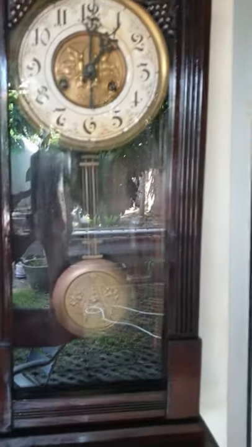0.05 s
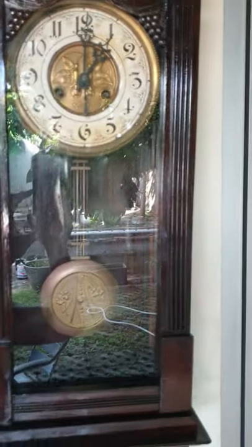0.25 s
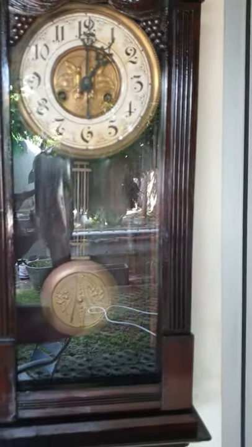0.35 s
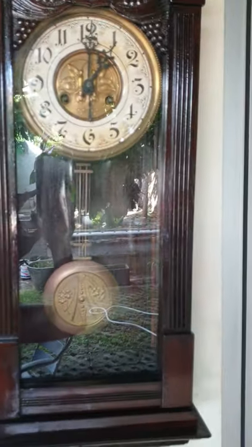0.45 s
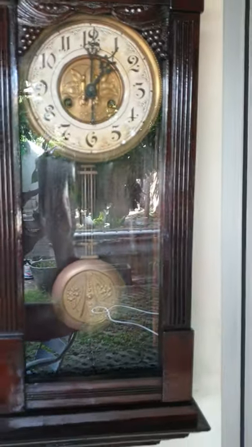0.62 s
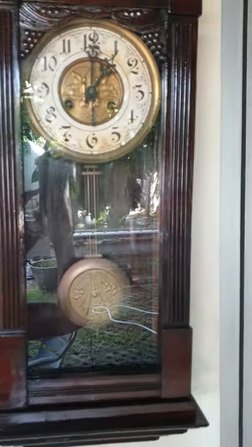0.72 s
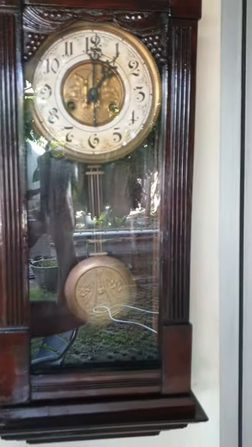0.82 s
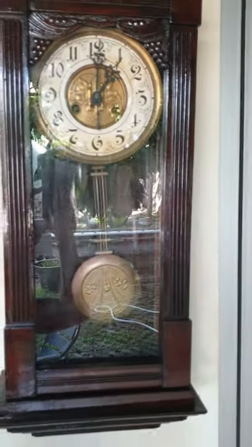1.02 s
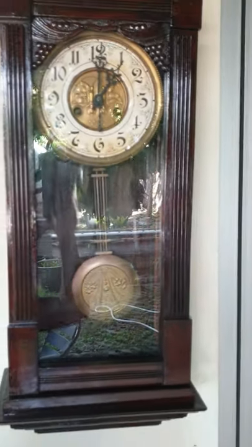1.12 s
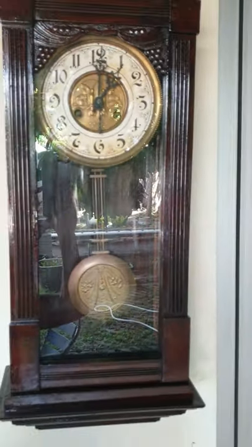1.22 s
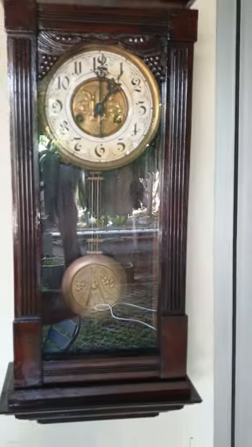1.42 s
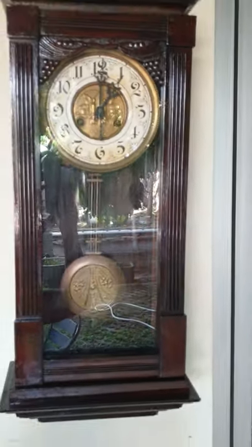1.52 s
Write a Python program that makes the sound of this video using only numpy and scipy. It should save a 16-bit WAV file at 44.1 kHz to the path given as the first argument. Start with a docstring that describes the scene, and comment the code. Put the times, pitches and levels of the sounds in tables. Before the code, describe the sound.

Two crisp mechanical ticks from a pendulum clock over faint room hiss.

```python
"""Two dry ticks, one pendulum swing apart, in a quiet room.
Each is a cluster of sharp clicks with a hollow knock, a low thump and a short ring.
Fainter ticks fall between and after them. Behind the ticks are soft room hiss
and the uneven rumble of a hand-held microphone, mostly on the right."""
import sys
import numpy as np
from scipy import signal
from scipy.fft import rfft, irfft
from scipy.io import wavfile
from scipy.ndimage import uniform_filter1d

SR = 44100
rng = np.random.default_rng(int(sys.argv[2]) if len(sys.argv) > 2 else 0)


def persist_wave(psi):
    """Save psi, clipped to +-1, as 16-bit WAV."""
    counts = np.round(np.clip(psi, -1, 1) * 32767).astype(np.int16)
    wavfile.write(sys.argv[1], SR, np.atleast_2d(counts).T)


N = 68355  # 1.55 seconds

# How a click rings: "tick" is a narrow ping, "tock" is broader and glassier. Columns: pitch_hz, gain_db
CLICK_TONES = {"tick": [(300, -5), (2100, -9), (3000, -7.5), (4100, -8.5), (5000, 5), (5750, 9),
               (6500, 1.5), (7300, 6), (8500, -8), (11000, -1.5), (13500, -12), (15400, -22), (16300, -30)],
               "tock": [(300, -20), (2100, -1.5), (3100, -2.5), (4300, -6), (5500, 0), (7200, -3.5),
               (8800, -15), (11400, -1), (12400, -8), (14300, -6), (15400, 2), (16300, -10)]}
# Sharp clicks. Positive pan leans left; positive tilt is brighter.
# Columns: start_s, level_db, pan_db, tilt_db_per_octave, chatter_ms, tone_name
CLICK_HITS = [(0.21, -40.5, 12, -8, 0.18, "tick"), (0.2112, -42, 14, 11, 0.19, "tick"),
              (0.2144, -35, 14, -3, .1, "tick"), (0.219, -29, 18, 4, 0.53, "tick"),
              (0.2203, -17.5, 11.5, 1.5, .015, "tick"), (0.2346, -28, 14, 14.5, .015, "tick"),
              (.7811, -45, -10, 7, 0.06, "tick"), (.913, -52, -6, 6, 0.27, "tock"),
              (0.918, -38, -12, 0, .2, "tock"), (0.9298, -31.5, 1, -6, 0.25, "tock"),
              (0.9335, -49, -28, -5, .3, "tock"), (0.9408, -28.5, -23, 1.5, 0.33, "tock"),
              (0.9418, -38, -16, -4, 0.37, "tock"), (0.952, -49, -7, 4, .2, "tock"),
              (.9739, -39.5, -13, -6.5, .2, "tock"), (1.0432, -46, -12, 4, 0.13, "tock")]


def clicks():
    """Each click is a spike and a brief chatter that set off a bright, very short ring."""
    t, out = np.arange(N) / SR, 0
    freq_hz = np.arange(N // 2 + 1) * SR / N
    octaves = np.log2(np.maximum(freq_hz, 1500) / 7000)  # the tilt pivots at 7000 Hz
    for start_s, level_db, pan_db, tilt_db, chatter_ms, tone_name in CLICK_HITS:
        push = 0.64 * rng.standard_normal(N) * np.exp(-t * 1000 / chatter_ms)
        push[0] = 1  # the opening spike
        ring = ring_after_hit(tone_gain(CLICK_TONES[tone_name]) * undb(tilt_db * octaves))
        click = filtered(push / np.linalg.norm(push), ring)
        out = out + place(click * undb(level_db), start_s, pan_db)
    return out


# Hollow knocks. Here and below, fade_s is the time to die away by 60 dB.
# Columns: start_s, level_db, pan_db, pitch_hz, fade_s, cutoff_hz
KNOCK_HITS = [(0.22, -19.5, -3, 317, 0.0047, 2100), (0.235, -40, 23.5, 685, 0.0055, 1180),
              (0.3271, -40.5, 6, 420, 0.014, 1210), (0.9295, -37, 17, 520, 0.0077, 1430),
              (0.9407, -32.5, 7, 497, 0.012, 1080), (.974, -47, -13, 616, 0.0061, 1210),
              (1.088, -44, -9, 280, 0.0094, 1100)]


def knocks():
    """Each knock is one note that dies almost at once; a lower cutoff makes it duller."""
    t, out = np.arange(N) / SR, 0
    for start_s, level_db, pan_db, pitch_hz, fade_s, cutoff_hz in KNOCK_HITS:
        note = undb(level_db - 60 * t / fade_s) * np.cos(2 * np.pi * pitch_hz * t)
        soften = signal.butter(6, cutoff_hz, fs=SR, output="sos")
        out = out + place(signal.sosfilt(soften, note), start_s, pan_db)
    return out


# Low thumps. Columns: start_s, level_db, pan_db, starting_pitch_hz, fade_s
THUMP_HITS = [(0.2205, -26.5, -24, 88.2, 0.12), (0.2356, -24, 3, 89, 0.028),
              (0.9293, -41.5, -31, 117, 0.043), (0.9428, -33.5, -20, 104, 0.1)]


def thumps(rise_s=0.001, sag_s=0.024, sag_fraction=0.605):
    """A few slow swings of pressure under each loud tick, sagging in pitch as they die."""
    t, out = np.arange(N) / SR, 0
    sag = 1 - sag_fraction * (1 - np.exp(-t / sag_s))
    for start_s, level_db, pan_db, starting_pitch_hz, fade_s in THUMP_HITS:
        swing = -np.sin(2 * np.pi * np.cumsum(starting_pitch_hz * sag) / SR)
        loudness = (1 - np.exp(-t / rise_s)) * undb(level_db - 60 * t / fade_s)
        out = out + place(swing * loudness, start_s, pan_db)
    return out


# Faint ticks, and the ringing after the loud ones.
# Columns: start_s, level_db, pan_db, centre_hz, width_hz, fade_s
RING_BANDS = [(.222, -67.5, 7.5, 11500, 7200, 0.38), (0.33, -69, 17.5, 6667, 3530, 0.15),
              (0.333, -53.5, 7, 416.7, 550, 0.13), (.930, -50.5, -0.5, 380, 700, 0.38),
              (0.937, -60, 0, 5556, 8000, 0.36), (1.535, -62.5, -4.5, 5050, 2480, .2),
              (1.538, -53, -5, 1590, 450, 0.32)]


def rings(rise_s=0.0017):
    """Hazy ringing: a band of noise that rises fast and dies away, different in each ear."""
    t, out = np.arange(N) / SR, 0
    freq_hz = np.arange(N // 2 + 1) * SR / N + 1
    for start_s, level_db, pan_db, centre_hz, width_hz, fade_s in RING_BANDS:
        off_centre = (freq_hz - centre_hz ** 2 / freq_hz) / (2 * width_hz)
        band = unit(filtered(rng.standard_normal((2, N)), 1 / (1 + off_centre ** 2) ** 2))
        loudness = (1 - np.exp(-t / rise_s)) * undb(level_db - 60 * t / fade_s)
        out = out + band * place(loudness, start_s, pan_db)
    return out


# The deep tone of the rumble. Columns: pitch_hz, gain_db
RUMBLE_TONE = [(15, -8), (35, -6), (62, 5.5), (100, -4), (170, -8), (300, -25.5), (600, -49), (1500, -97)]
# How loud the rumble is on the right. Columns: time_s, level_db
RUMBLE_SWELLS = [(0, -52.5), (.06, -39), (.13, -57.5), (.2, -46), (.27, -41), (.32, -43), (.42, -39.5),
                 (.48, -47.5), (.56, -42.5), (.62, -63), (.75, -45.5), (.84, -51.5), (.89, -62),
                 (.97, -44.5), (1.08, -45.5), (1.18, -52.5), (1.35, -41.5), (1.43, -55), (1.55, -52.5)]


def handling_rumble(left_db=-16.5):
    """A microphone moving in the hand makes an uneven low rumble, weaker on the left."""
    rumble = unit(filtered(rng.standard_normal((2, N)), tone_gain(RUMBLE_TONE)))
    return rumble * level_curve(RUMBLE_SWELLS) * undb([[left_db], [0]])


# The tone of the room's hiss before it swells. Columns: pitch_hz, left_db_per_hz, right_db_per_hz
HISS_TONE = [(19.9, -126, -93), (102, -88, -72.5), (216, -81.5, -84), (412, -85.5, -88), (638, -95, -102),
             (1000, -100, -102), (1520, -101.5, -99), (2110, -100, -96.5), (3450, -110, -111),
             (4500, -107, -113), (6340, -103, -110), (7500, -105, -112), (7870, -119, -120),
             (12200, -119, -118), (15700, -121, -120), (16500, -135, -135)]
# How the low, middle and high parts of the hiss swell and dip. Columns: time_s, gain_db
LOW_SWELLS = [(0, 4), (.18, 1), (.4, 0), (.56, 1), (.65, -4.5), (.75, -8.5), (.85, 1), (1.08, 3.5),
              (1.25, -3.5), (1.38, -0.5), (1.5, -4.5)]
MID_SWELLS = [(0, 3.5), (.07, 4.5), (.17, 2), (.3, 5.5), (.42, 0.5), (.52, 2), (.62, -1), (.73, -2),
              (.88, 3), (1.1, 2), (1.2, -3.5), (1.34, 2.5), (1.48, -6.5), (1.55, 2)]
HIGH_SWELLS = [(0, 0), (.15, 0.5), (.3, 0.5), (.46, -3.5), (.64, 2), (.8, 1), (.95, 2), (1.12, 0),
               (1.3, -2.5), (1.42, -4), (1.5, -0.5), (1.55, 6.5)]


def room_hiss(low_top_hz=450, mid_top_hz=2520, shared=0.18, flicker_db=1.24):
    """Soft room noise, partly shared by both ears; it swells, and its lows and middle flicker."""
    noise = np.sqrt(shared) * rng.standard_normal(N)
    noise = noise + np.sqrt(1 - shared) * rng.standard_normal((2, N))
    tone = np.array(HISS_TONE)
    ear_gains = np.array([tone_gain(tone[:, [0, ear]]) for ear in (1, 2)])
    air = filtered(noise, ear_gains) * np.sqrt(SR / 2)
    lows = filtered(air, tone_gain([(low_top_hz, 0), (2 * low_top_hz, -30)]))
    body = filtered(air, tone_gain([(mid_top_hz, 0), (2 * mid_top_hz, -30)]))
    mids, highs = body - lows, air - body
    swelling_body = lows * level_curve(LOW_SWELLS) + mids * level_curve(MID_SWELLS)
    flicker = undb(flicker_db * wander(rate_hz=25.79))
    return swelling_body * flicker + highs * level_curve(HIGH_SWELLS)


def undb(db):
    """Turn decibels into a number to multiply by."""
    return 10 ** (np.asarray(db) / 20)


def unit(x):
    """Scale to an average (rms) level of 1."""
    return x / np.sqrt(np.mean(x ** 2))


def tone_gain(points):
    """Gain at every frequency, from (pitch_hz, gain_db) points."""
    hz, db = np.array(points, float).T
    freq_hz = np.arange(N // 2 + 1) * SR / N + 1
    return undb(np.interp(np.log(freq_hz), np.log(hz), db))


def filtered(x, gain):
    """Turn each frequency up or down by its gain."""
    return irfft(rfft(x) * gain, N)


def ring_after_hit(gain):
    """A filter with the same tone that rings only after the hit (minimum phase)."""
    cepstrum = irfft(np.log(gain), N)
    cepstrum[1:N // 2] *= 2
    cepstrum[N // 2:] = 0
    return np.exp(rfft(cepstrum))


def level_curve(points):
    """Gain over time, from (time_s, gain_db) points."""
    return undb(np.interp(np.arange(N) / SR, *np.array(points).T))


def wander(rate_hz):
    """A smooth random drift, about 1 in size."""
    hold = int(SR / rate_hz)
    steps = np.repeat(rng.standard_normal(N // hold + 1), hold)
    return unit(uniform_filter1d(uniform_filter1d(steps, hold), hold)[:N])


def place(x, start_s, pan_db):
    """Start a sound at its time and lean it left or right."""
    delayed = np.concatenate([np.zeros(int(start_s * SR)), x])[:N]
    return delayed * undb(np.array([[pan_db], [-pan_db]]) / 2)


def scene():
    """The ticks, the room and the handling noise together."""
    return clicks() + knocks() + thumps() + rings() + room_hiss() + handling_rumble()


def record(dry):
    """The recorder cuts the treble above 16300 Hz."""
    return signal.sosfilt(signal.ellip(10, .1, 80, 16300, fs=SR, output="sos"), dry)


dry = scene()
out = record(dry)
persist_wave(out)
```